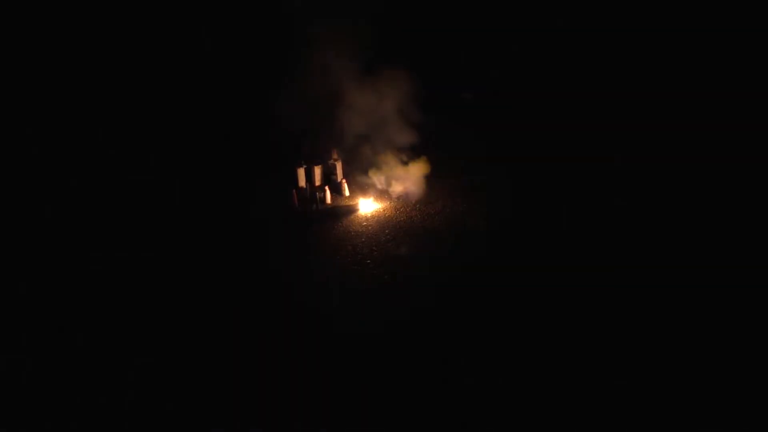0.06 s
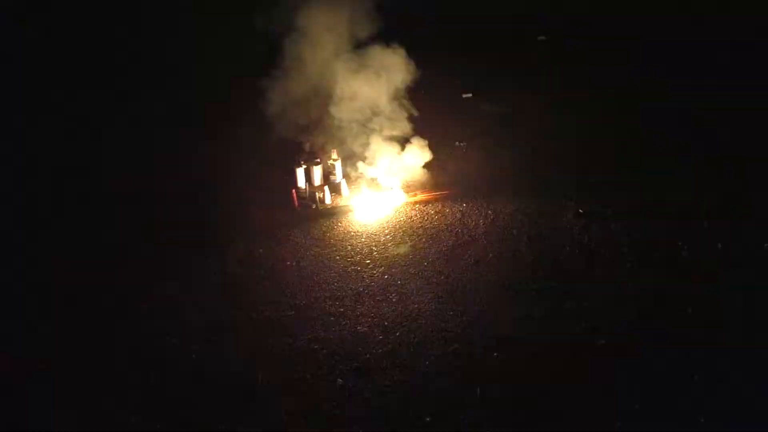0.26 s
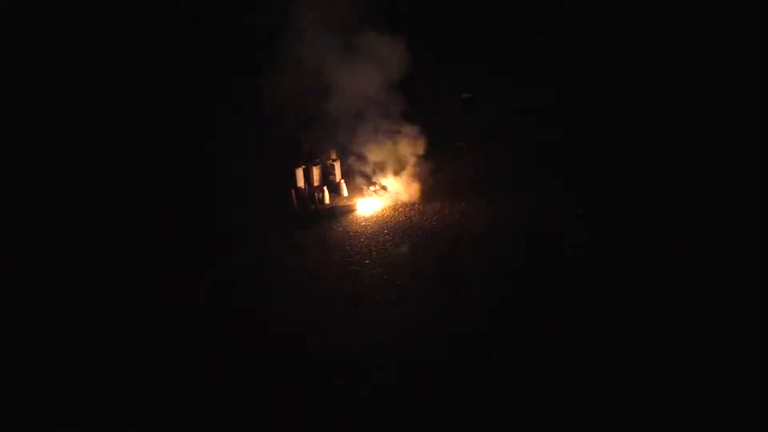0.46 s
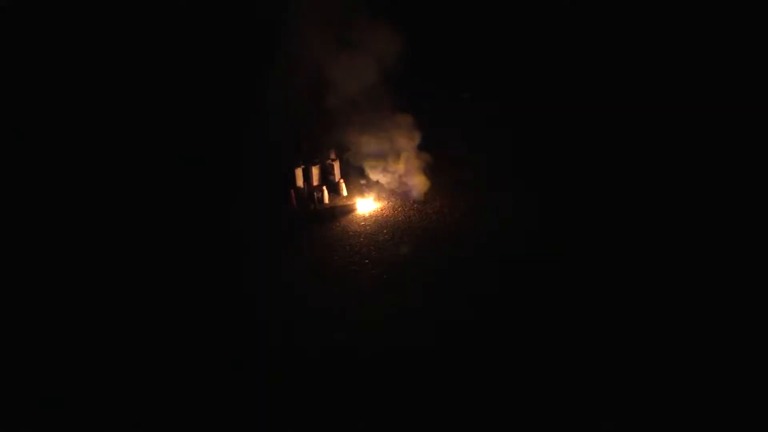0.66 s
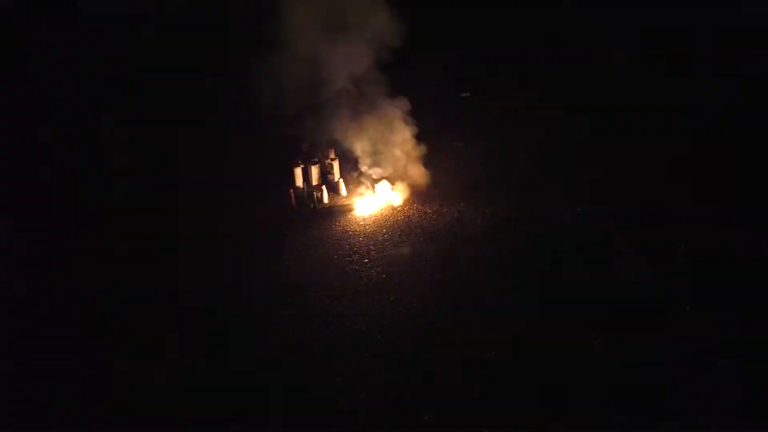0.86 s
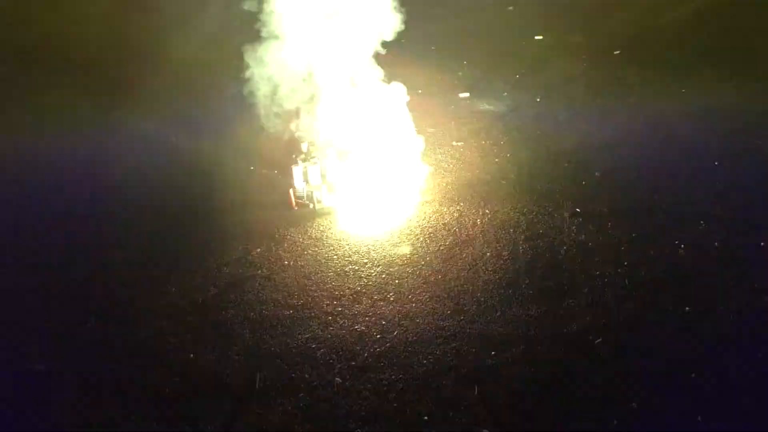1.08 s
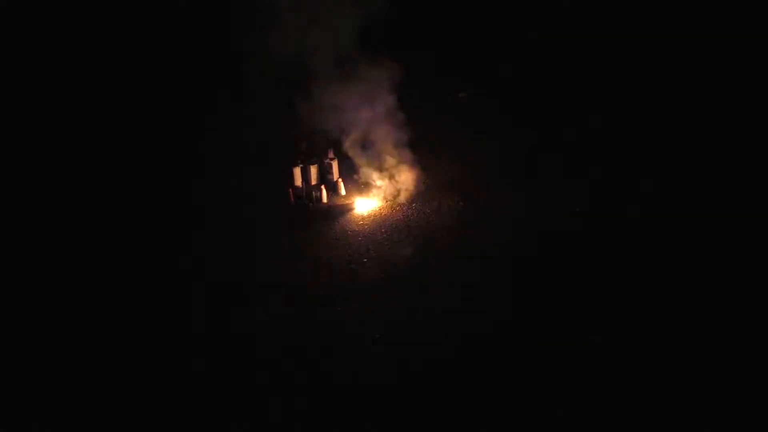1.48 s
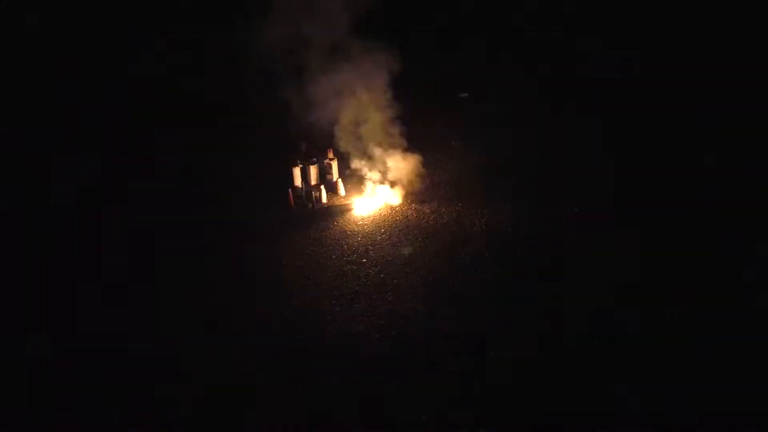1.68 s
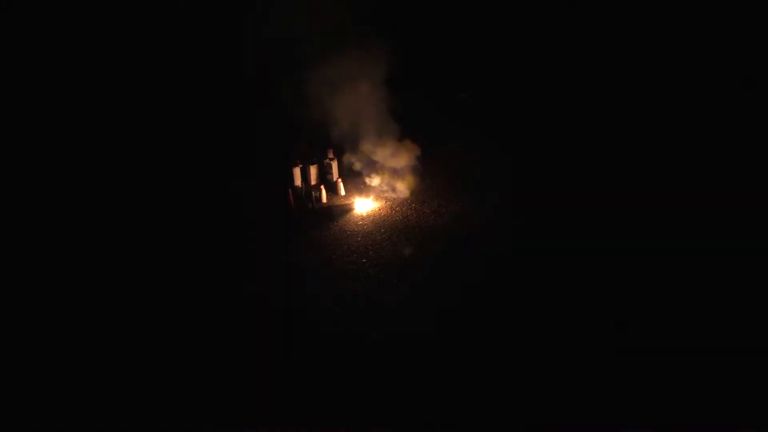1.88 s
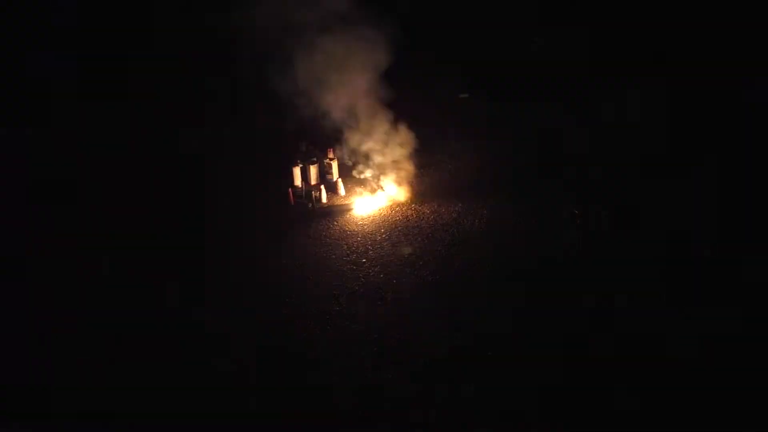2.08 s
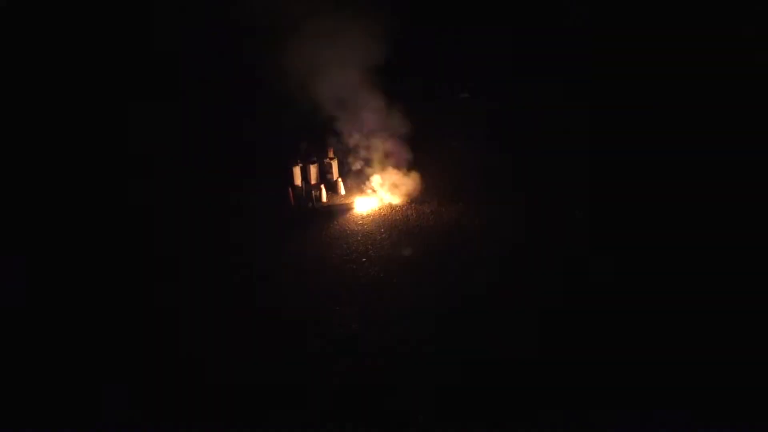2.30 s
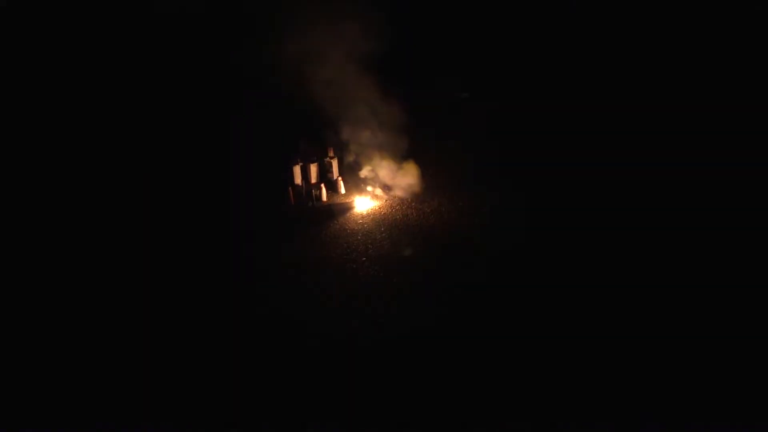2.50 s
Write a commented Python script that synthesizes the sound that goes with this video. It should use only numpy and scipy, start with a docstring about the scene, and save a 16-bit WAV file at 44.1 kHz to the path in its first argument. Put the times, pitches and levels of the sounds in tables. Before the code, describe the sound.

A strobe flare burns on asphalt a few metres away, giving eight quick bursts of crackling hiss, each with a gassy puff and low thump. It fizzes and spits between them and snaps sharply near the end, over a soft outdoor rush.

```python
"""Asphalt at night, a few metres from a burning strobe flare. Its crust flashes eight times: a short swell
of crackling hiss with a puff of gas and a low thump, then a sizzling afterburn. Between flashes it fizzes,
spits and now and then snaps. The burning noise is tiny pops plus rushing gas, through fixed resonances.
Nearby reflections widen it. Behind it lie a soft outdoor rush, a deep hum and thin microphone hiss."""
import sys
import numpy as np
from scipy import signal
from scipy.fft import rfft, irfft, next_fast_len
from scipy.io import wavfile
from scipy.ndimage import map_coordinates

SR = 44100
rng = np.random.default_rng(int(sys.argv[2]) if len(sys.argv) > 2 else 0)


def materialize(psi):
    """Save the field psi as 16-bit PCM at rate SR to the path in sys.argv[1].

    A 1-D psi becomes a single channel; in a 2-D psi each row is a channel.
    """
    bounded = np.clip(np.atleast_2d(psi).T, -1, 1)
    quanta = np.round(bounded * 32767).astype(np.int16)
    wavfile.write(sys.argv[1], SR, quanta)


N = 116865

# burning hiss spectrum (frequency [Hz], gain [dB])
HISS_SPECTRUM = [(100, -31.5), (300, -8), (800, -4.5), (2000, -6.5), (3800, -1), (4600, -5.5), (6300, -3.5),
                 (8200, -10.5), (9500, -19), (12000, -45), (16000, -18.5)]


def amp(db):
    """Decibels to gain."""
    return 10 ** (np.asarray(db) / 20)


def unit(x):
    """Scale to rms 1."""
    return x / np.sqrt(np.mean(x ** 2) + 1e-20)


def along(points, hz):
    """Interpolate (frequency [Hz], value) points on a log axis."""
    f, v = np.transpose(points)
    return np.interp(np.log(hz + 1), np.log(f + 1), v)


def clock():
    """Sample times [s]."""
    return np.arange(N) / SR


def wobble(knots_per_s):
    """Smooth random curve."""
    knots = rng.standard_normal(int(N * knots_per_s / SR) + 4)
    return map_coordinates(knots, [clock() * knots_per_s])


def filtered(x, response):
    """Apply the complex gain response(hz)."""
    m = next_fast_len(N + SR // 2)
    return irfft(rfft(x, m) * response(np.fft.rfftfreq(m, 1 / SR)), m)[..., :N]


def coloured(x, db_at, size=4096):
    """Minimum-phase filter with gain db_at(hz)."""
    cepstrum = irfft(np.log(amp(db_at(np.fft.rfftfreq(size, 1 / SR)))))
    cepstrum[1:size // 2] *= 2
    cepstrum[size // 2 + 1:] = 0
    return signal.fftconvolve(x, irfft(np.exp(rfft(cepstrum))))[:N]


def mic_hiss(level_db=-59):
    """Thin steady microphone hiss, independent in each channel."""
    # microphone hiss spectrum (frequency [Hz], gain [dB])
    spectrum = [(2000, -18), (5000, -6), (8000, 14), (10800, 14.5), (12500, -3), (16000, -10)]
    noise = rng.standard_normal((2, N))
    return amp(level_db) * unit(filtered(noise, lambda hz: amp(along(spectrum, hz))))


def outdoors(hum_hz=26.9, hum_db=-41.5, hum_side_rad=0.76):
    """Wide, soft rush of the surroundings over a deep hum."""
    # rush spectrum (frequency [Hz], gain [dB])
    spectrum = [(20, -5.5), (37, -8.5), (52, -10.5), (110, -15), (185, -14), (280, -18), (400, -16.5),
                (600, -16.5), (850, -18), (1080, -16.5), (1350, -18.5), (2300, -24.5), (3300, -31),
                (5000, -32), (8000, -61), (12000, -46.5)]
    # rush envelope (time [s], level [dB])
    levels = [(0, -37), (.25, -35.5), (.6, -40), (1, -40.5), (1.5, -37.5), (1.85, -37.5), (2.3, -38),
              (2.65, -38.5)]
    # likeness of the two ears (frequency [Hz], correlation [-1..1])
    correlation = [(60, 0.38), (130, 0.21), (290, -0.031), (640, -0.73), (1410, 0.014), (3100, -0.05),
                   (7000, 0.16), (15000, -.3)]
    width_rad = lambda hz: np.arccos(np.clip(along(correlation, hz), -1, 1)) / 2
    shape = lambda hz: amp(along(spectrum, hz)) * [np.cos(width_rad(hz)), np.sin(width_rad(hz))]
    mid, side = filtered(rng.standard_normal((2, N)), shape)
    rush_db = np.interp(clock(), *np.transpose(levels)) + 0.2 * wobble(14)
    rush = unit(np.array([mid + side, mid - side])) * amp(rush_db)
    phase = 2 * np.pi * hum_hz * clock() + 0.2 * wobble(3.6) + hum_side_rad * np.array([[1], [-1]])
    return rush + amp(hum_db) * np.sqrt(2) * np.sin(phase)


def yard_reverb(x):
    """Answer of the surroundings: a noise tail, shortest near 2 kHz."""
    # reverberation time (frequency [Hz], T60 [s])
    decay = [(200, 0.6), (2000, 0.093), (10000, 0.42)]
    hz, t, bins = signal.stft(rng.standard_normal((2, SR // 2)), SR, nperseg=256)
    tail = signal.istft(bins * amp(-60 * t / along(decay, hz)[:, None]), SR, nperseg=256)[1]
    return signal.fftconvolve(x[None], tail / np.linalg.norm(tail[0]), axes=1)[:, :N]


def near_reflections(x, taps=400):
    """Side signal: echoes off the ground and nearby things within a few milliseconds."""
    # stereo width (frequency [Hz], side gain [dB])
    width = [(60, 7), (150, -23), (400, -20.5), (1000, -22), (3000, -17), (8000, -4)]
    echoes = rng.standard_normal(taps) * np.hanning(taps)
    reflected = signal.fftconvolve(x, echoes / np.linalg.norm(echoes))[:N]
    return filtered(reflected, lambda hz: amp(along(width, hz)))


def sizzle(spectrum, pop_share, vent_hz=None):
    """Burning noise, rms 1: tiny pops and rushing gas through resonances, with a lift at any vent_hz."""
    # fixed resonances of the ground and nearby walls (centre [Hz], width [Hz], lift [dB])
    resonances = [(290, 80, 4), (770, 90, 5), (1010, 80, 6), (1420, 90, 5), (1820, 110, 7), (2090, 50, 4),
                  (2430, 60, 3), (2800, 110, 4), (3270, 60, 4), (3690, 90, 3), (4130, 130, 6.5),
                  (4720, 90, 3), (5220, 130, 4), (5750, 90, 3), (6140, 150, 5), (6680, 80, 3),
                  (7050, 120, 3), (7850, 120, 4), (8230, 100, 4)]
    pops_per_s, spread_db = 4500, 5
    vent_db, vent_octaves = 5, 0.57
    size_db = spread_db * np.minimum(rng.standard_normal(N), 2)
    pops = (rng.random(N) < pops_per_s / SR) * rng.choice([-1, 1], N) * amp(size_db)
    source = np.sqrt(pop_share) * unit(pops) + np.sqrt(1 - pop_share) * rng.standard_normal(N)
    lift = lambda hz: sum(db * np.exp(-((hz - centre) / width) ** 2) for centre, width, db in resonances)
    vent = lambda hz: vent_db * np.exp(-(np.log2((hz + 1) / vent_hz) / vent_octaves) ** 2) if vent_hz else 0
    return unit(coloured(source, lambda hz: along(spectrum, hz) + lift(hz) + vent(hz)))


def swell(peak_s, rise_s, fall_s, drop_db=12.5):
    """Burn envelope: catches, grows to 1, is drop_db down after fall_s."""
    t = clock() - peak_s
    growth = np.clip(1 + t / rise_s, 0, 1) ** 0.99
    return growth * amp(-drop_db * np.clip(t / fall_s, 0, 10) ** 1.13)


def smoulder():
    """Dark phase: flickering fizz with short spits."""
    # fizz envelope (time [s], level [dB])
    fizz_levels = [(0, -44.5), (.22, -50), (.5, -49.5), (.67, -44.5), (.73, -52), (.9, -59), (1.02, -49.5),
                   (1.2, -44), (1.53, -46), (1.76, -44), (1.9, -49), (1.95, -60), (2.29, -42),
                   (2.35, -46.5), (2.39, -41), (2.45, -54), (2.65, -53.5)]
    # spits (peak time [s], level [dB], half length [s])
    spit_events = [(0.363, -26, 0.016), (0.524, -36.5, 0.0043), (0.611, -38, 0.0049), (0.645, -39.5, 0.022),
                   (0.83, -23.5, 0.0067), (0.862, -26.5, 0.0054), (0.952, -34, 0.018), (.978, -36, 0.0081),
                   (1.066, -28.5, 0.015), (1.207, -34, 0.0059), (1.242, -30.5, 0.012), (1.39, -34, 0.012),
                   (1.428, -32.5, 0.016), (1.452, -31.5, .01), (1.474, -30.5, 0.013), (1.681, -26, 0.0066),
                   (1.733, -34.5, 0.0092), (2.049, -27.5, 0.01), (2.107, -33.5, 0.0053), (2.3, -32, .013),
                   (2.502, -38, 0.018), (2.591, -42.5, 0.014)]
    fizz_db = np.interp(clock(), *np.transpose(fizz_levels)) + 1.5 * wobble(150)
    fizz = amp(fizz_db) * sizzle(HISS_SPECTRUM, pop_share=0.57)
    spit_gain = sum(amp(db) * swell(peak_s, half_s, half_s) for peak_s, db, half_s in spit_events)
    return fizz + spit_gain * sizzle(HISS_SPECTRUM, pop_share=0.87)


def snaps():
    """Dry snaps of the crust: a sharp click, its ground bounce and a short scatter."""
    # snaps (time [s], level before filtering [dB])
    events = [(.103, -14), (0.522, -13), (.696, -19), (1.778, -13), (1.92, -17), (2.3033, -10), (2.3734, 4)]
    # snap spectrum (frequency [Hz], gain [dB])
    spectrum = [(200, -27), (900, -6), (2000, -4.5), (4000, -2.5), (8000, -3.5), (11000, -16), (16000, -9)]
    scatter_db, scatter_t60_s = -2, 0.048
    bounce_db, bounce_s = -12, 0.00103
    clicks = np.zeros(N)
    for start_s, db in events:
        t = np.maximum(clock() - start_s, 0)
        scatter = (t > 0) * amp(-60 * t / scatter_t60_s) * rng.standard_normal(N)
        clicks += amp(db + scatter_db) * scatter / np.linalg.norm(scatter)
        clicks[round(start_s * SR)] -= amp(db)
        clicks[round((start_s + bounce_s) * SR)] -= amp(db + bounce_db)
    return coloured(clicks, lambda hz: along(spectrum, hz))


def flashes():
    """Crust flashes: a hiss, a shorter gas puff with a thump, an afterburn that sags and goes out."""
    # flashes (peak time [s], level [dB], rise [s], fall [s], relative puff [dB], puff centre [Hz],
    # relative thump [dB], afterburn level [dB], afterburn length [s])
    events = [(0.263, -18, 0.028, 0.026, -0.5, 900, -13, -25, .13),
              (.406, -19, 0.029, 0.0098, 2, 1000, -6.5, -33.5, 0.094),
              (0.797, -17, 0.033, 0.021, -1.5, 710, -10, -27.5, .13),
              (1.093, -16.5, .028, 0.0085, -3, 1920, -10.5, -24, 0.07),
              (1.302, -17.5, .026, 0.02, 0, 1460, -15.5, -36.5, 0.19),
              (1.608, -18, 0.029, 0.035, -2.5, 940, -21.5, -31, .13),
              (1.99, -18, 0.013, 0.019, 3.5, 950, -8, -28, 0.12),
              (2.206, -17, .036, 0.017, -4, 1110, -13, -29.5, 0.074)]
    # gas puff spectrum (frequency [Hz], gain [dB])
    puff_spectrum = [(60, -18), (200, -13), (400, -9), (800, -1.5), (1800, -1), (3500, 0), (6000, -8),
                     (10000, -66)]
    # thump spectrum (frequency [Hz], gain [dB])
    thump_spectrum = [(25, 2), (70, -1), (140, 6.5), (290, 6), (500, -2.5), (1200, -18), (4000, -63)]
    lag_s, puff_scale, thump_scale = 0.003, 0.89, 0.62  # timing against the hiss
    sag_db, die_db_per_s, flicker_db = 7.5, 330, 1.4
    hiss_gain, puffs, thump_gain, after_gain = np.zeros((4, N))
    for peak_s, db, rise_s, fall_s, puff_db, puff_hz, thump_db, after_db, after_s in events:
        hiss_gain += amp(db) * swell(peak_s, rise_s, fall_s)
        puff_gain = amp(db + puff_db) * swell(peak_s + lag_s, rise_s * puff_scale, fall_s * puff_scale)
        puffs += puff_gain * sizzle(puff_spectrum, pop_share=0.13, vent_hz=puff_hz)
        thump_swell = swell(peak_s + lag_s, rise_s * thump_scale, fall_s * thump_scale)
        thump_gain += amp(db + thump_db) * thump_swell
        t = np.maximum(clock() - peak_s, 0)
        fade_db = sag_db * t / after_s + die_db_per_s * np.maximum(t - after_s, 0)
        after_gain += (t > 0) * amp(after_db - fade_db)
    hiss = hiss_gain * sizzle(HISS_SPECTRUM, pop_share=0.22)
    thumps = thump_gain * sizzle(thump_spectrum, pop_share=0.022)
    afterburn = after_gain * amp(flicker_db * wobble(220)) * sizzle(HISS_SPECTRUM, pop_share=0.71)
    return hiss + amp(-1) * puffs + thumps + afterburn


def scene():
    """The flare arrives slightly sooner on the left; the background leans left."""
    # flare balance (frequency [Hz], left minus right [dB])
    flare_balance = [(100, -2.5), (750, 1.5), (1150, -2), (2500, 1), (4200, -1.5), (6400, 2), (9000, -1.8),
                     (14000, 6.5)]
    # background balance (frequency [Hz], left minus right [dB])
    background_balance = [(60, 2), (200, 2.5), (380, 8), (700, 11), (1300, 3), (2400, 11.5), (4400, 7),
                          (8000, -0.5)]
    left_lead_s, reverb_db = 3.6e-5, -17.5
    sides = np.array([[0.5], [-0.5]])
    flare = flashes() + smoulder() + snaps()
    lead = lambda hz: np.exp(2j * np.pi * hz * sides * left_lead_s)
    direct = filtered(flare, lambda hz: amp(sides * along(flare_balance, hz)) * lead(hz))
    background = filtered(outdoors(), lambda hz: amp(sides * along(background_balance, hz)))
    reflections = 2 * sides * near_reflections(flare) + amp(reverb_db) * yard_reverb(flare)
    return direct + reflections + background + mic_hiss()


def record(dry, top_hz=16000):
    """Band limit: nothing above top_hz."""
    return filtered(dry, lambda hz: hz < top_hz)


dry = scene()
out = record(dry)
materialize(out)
```